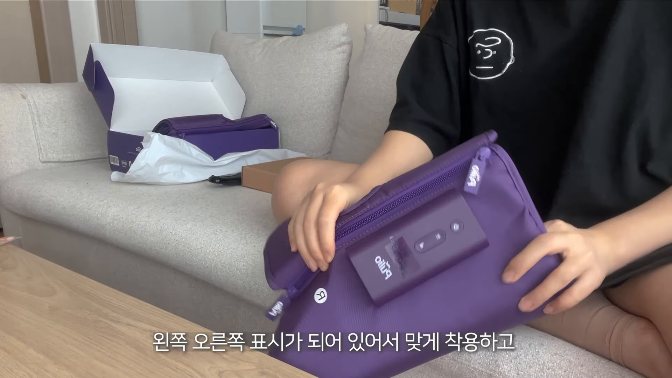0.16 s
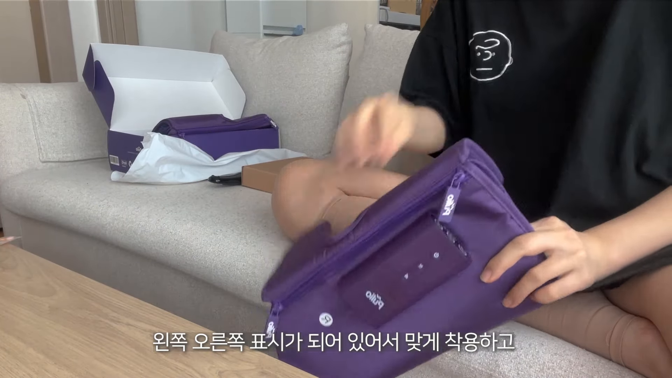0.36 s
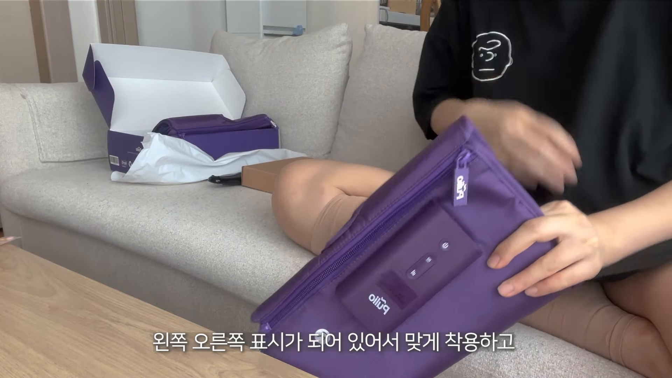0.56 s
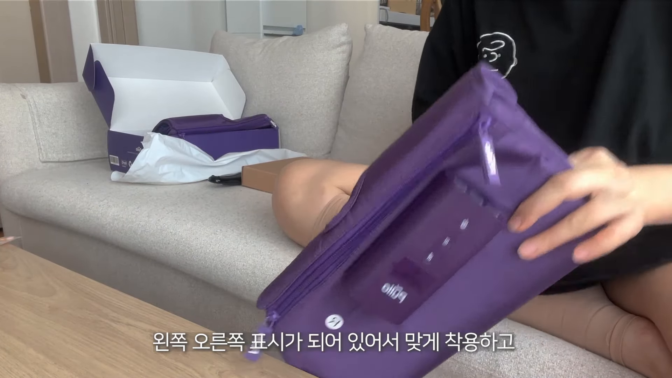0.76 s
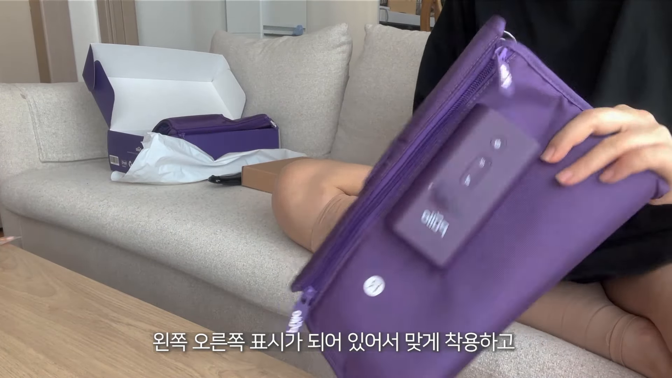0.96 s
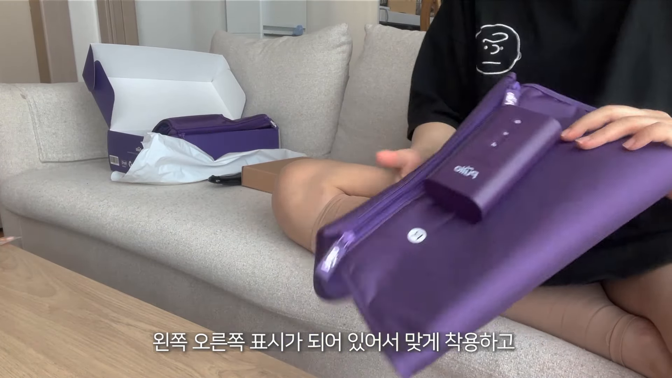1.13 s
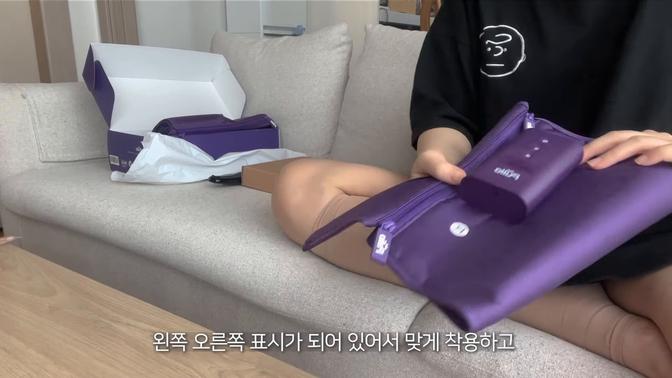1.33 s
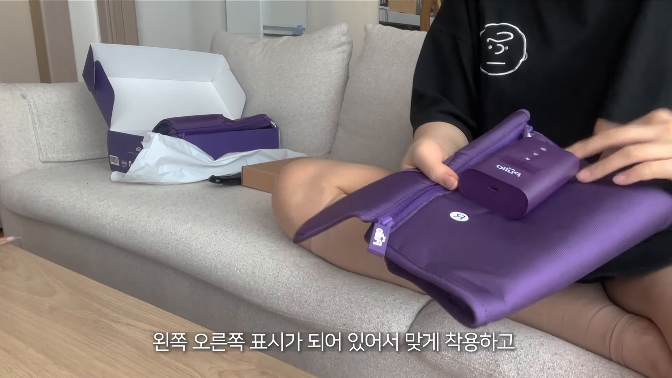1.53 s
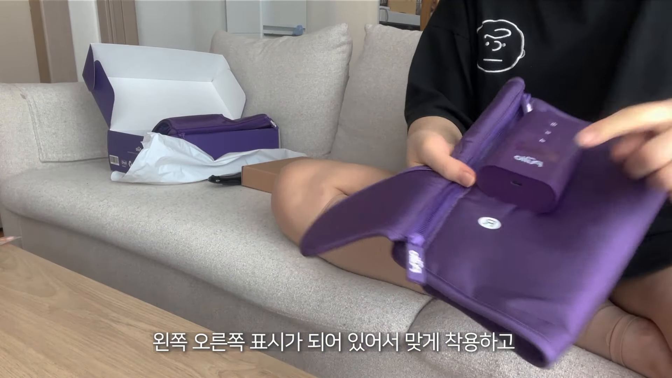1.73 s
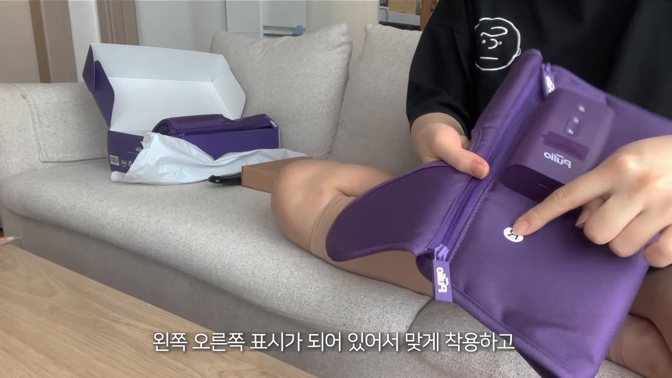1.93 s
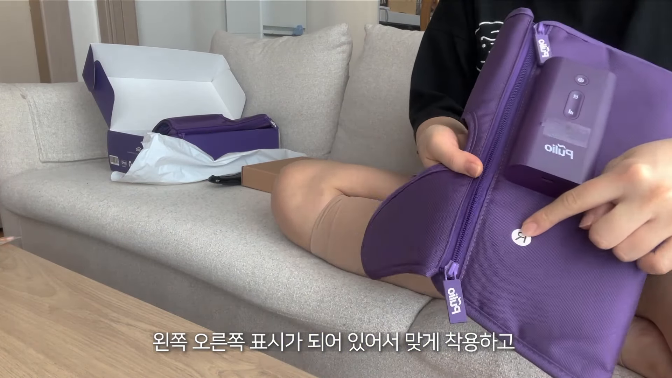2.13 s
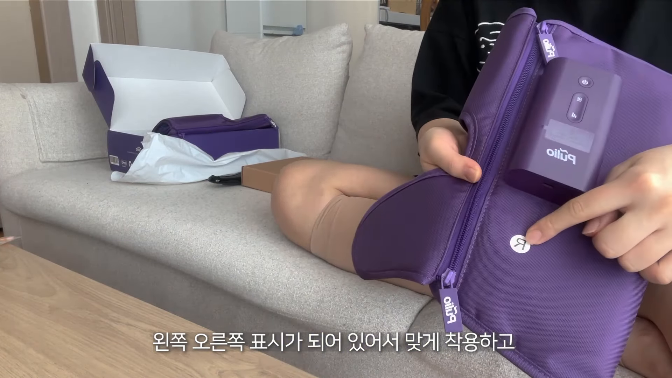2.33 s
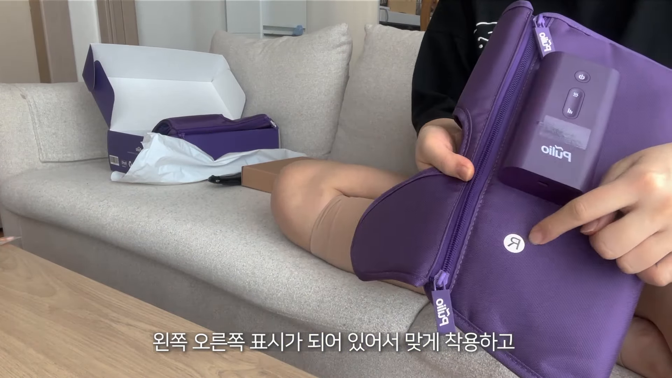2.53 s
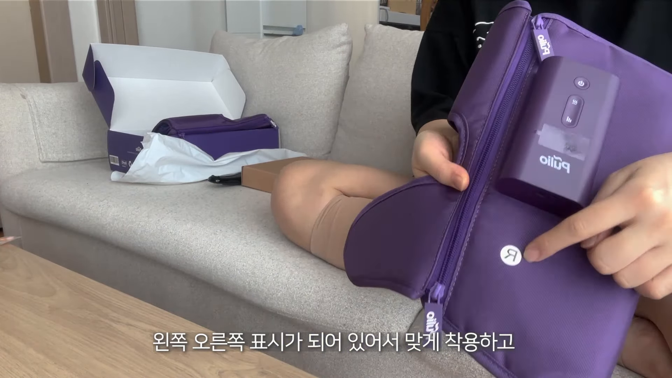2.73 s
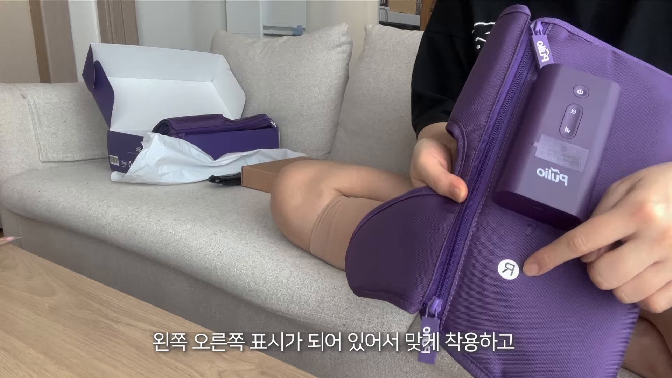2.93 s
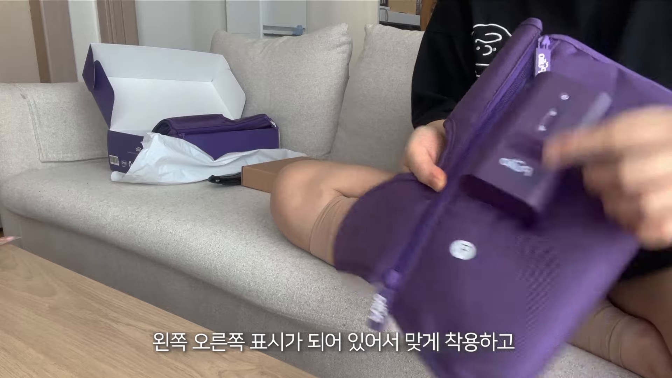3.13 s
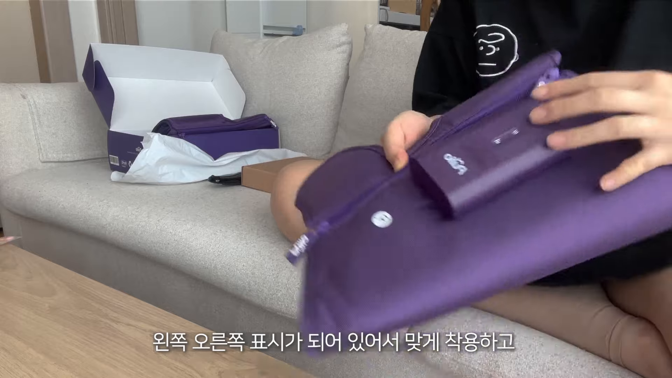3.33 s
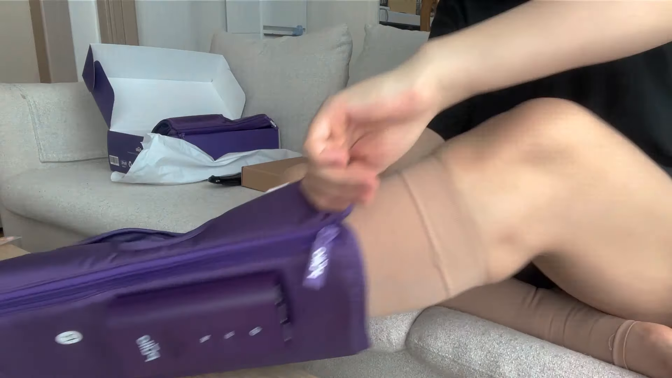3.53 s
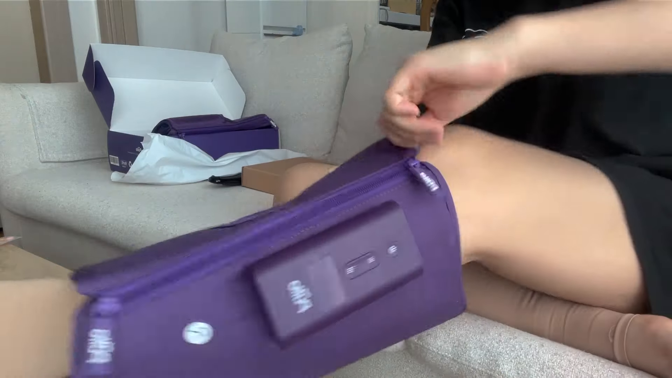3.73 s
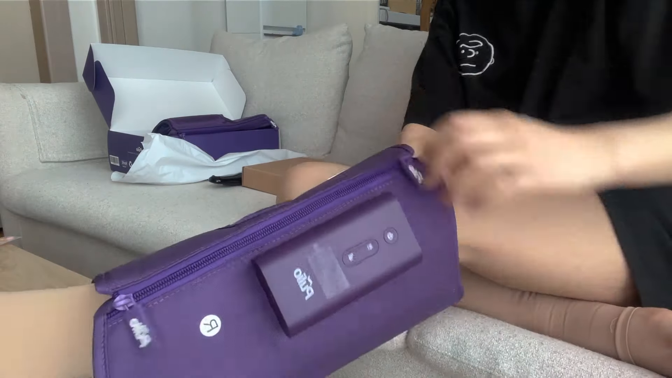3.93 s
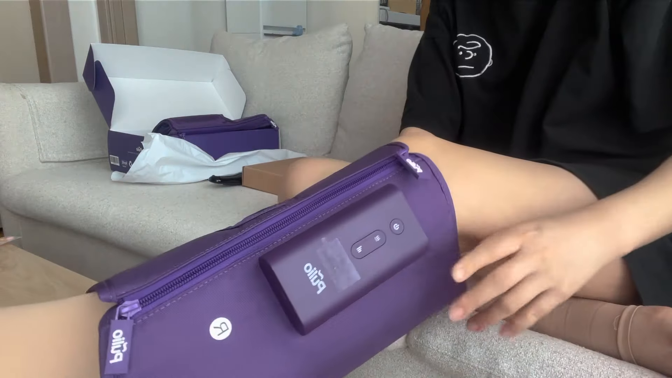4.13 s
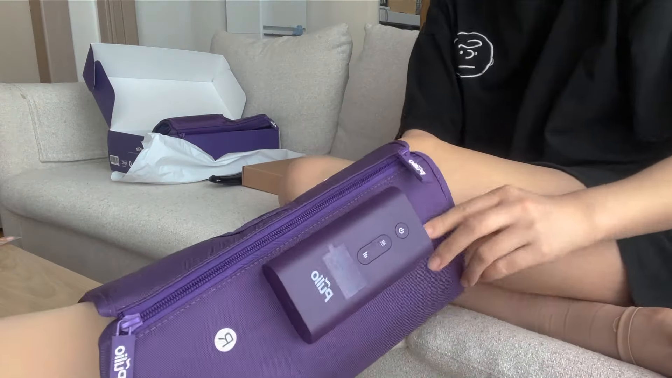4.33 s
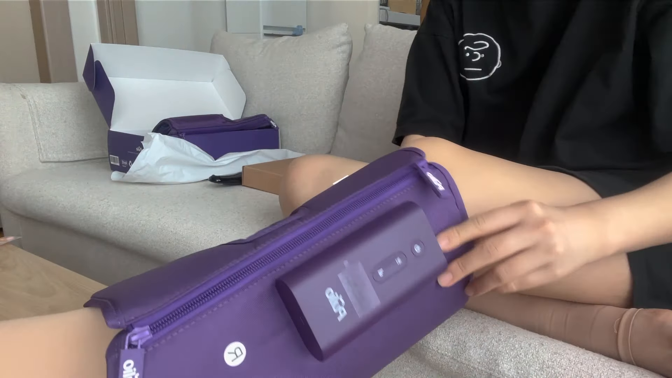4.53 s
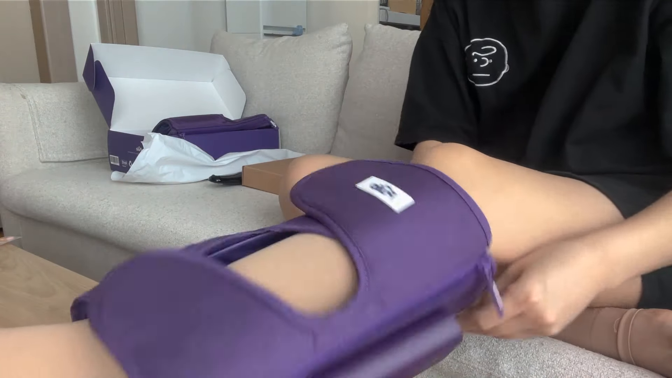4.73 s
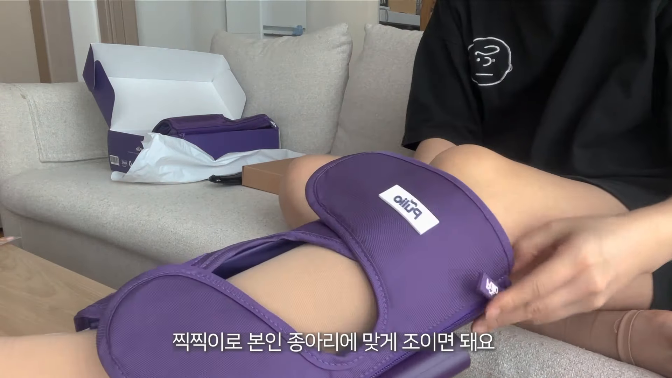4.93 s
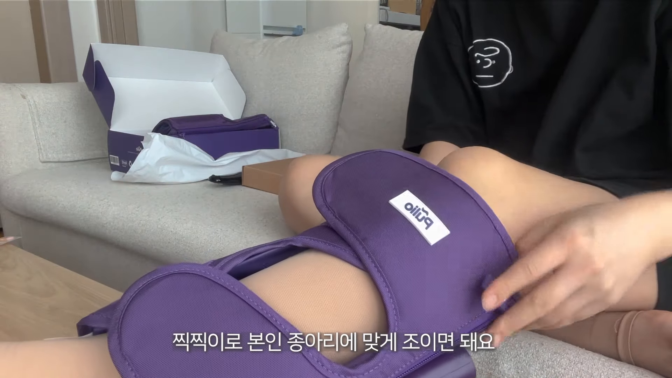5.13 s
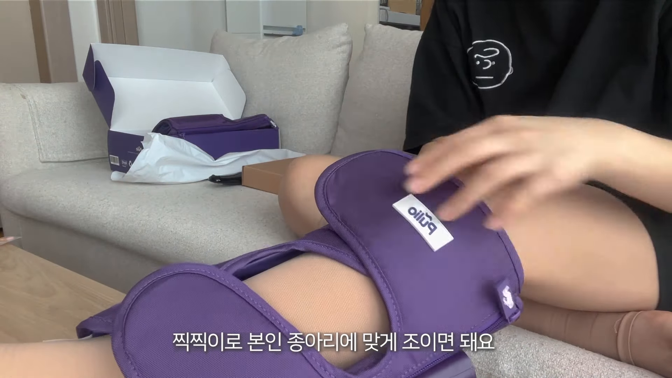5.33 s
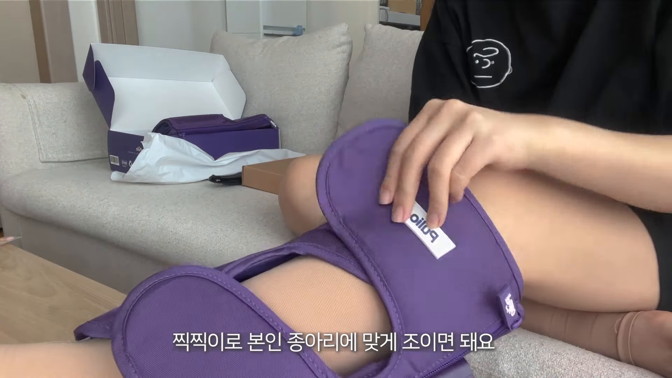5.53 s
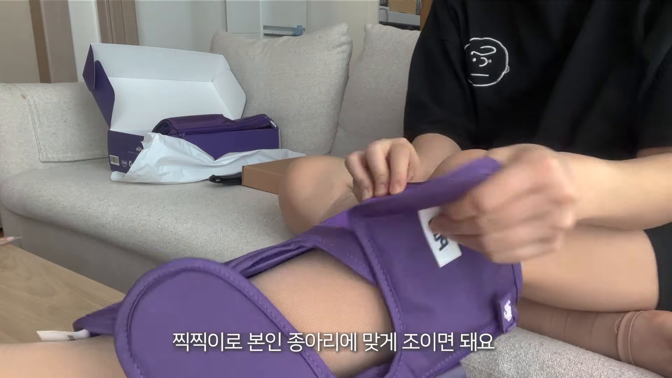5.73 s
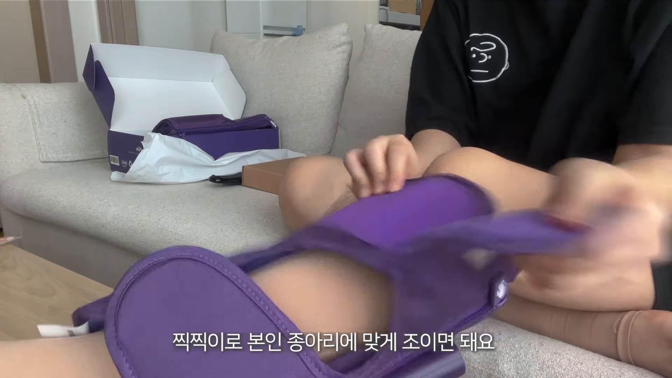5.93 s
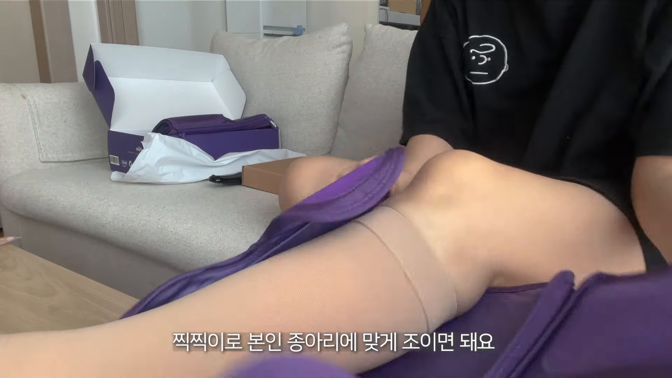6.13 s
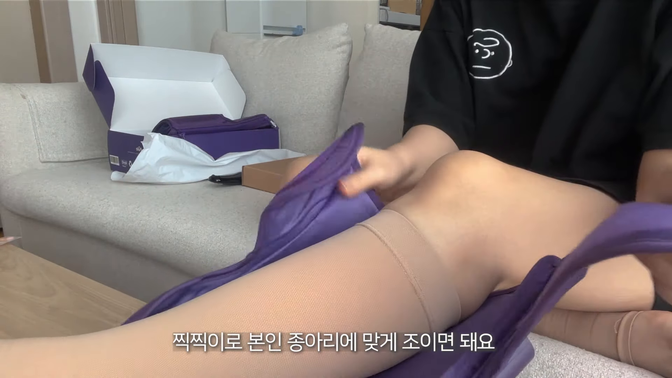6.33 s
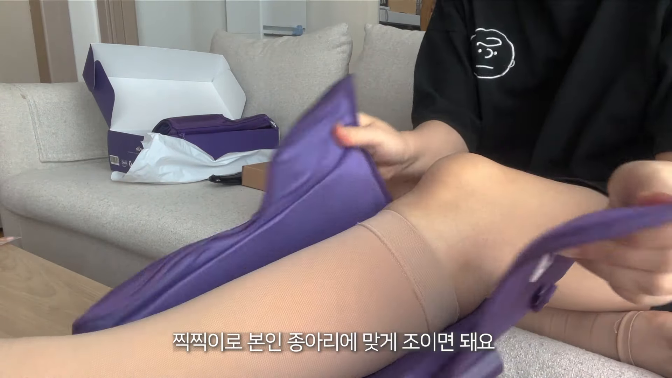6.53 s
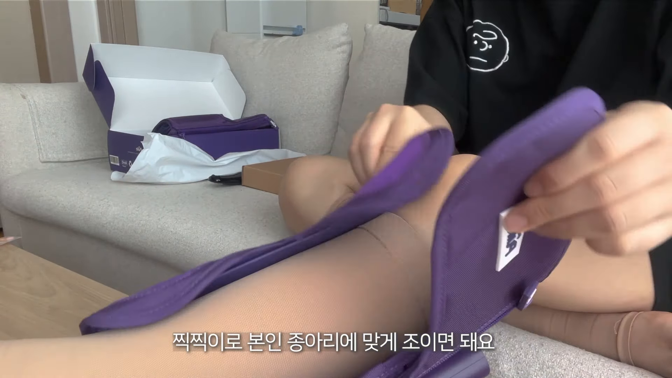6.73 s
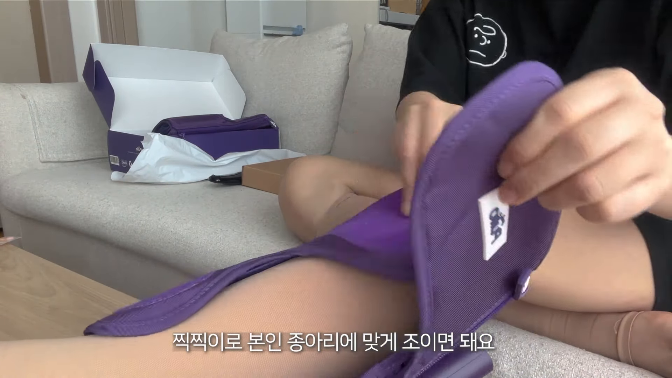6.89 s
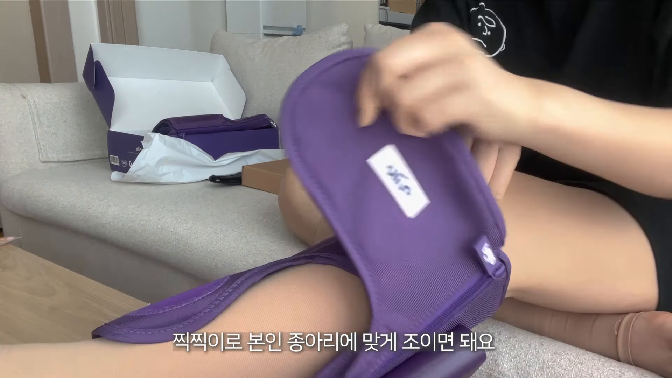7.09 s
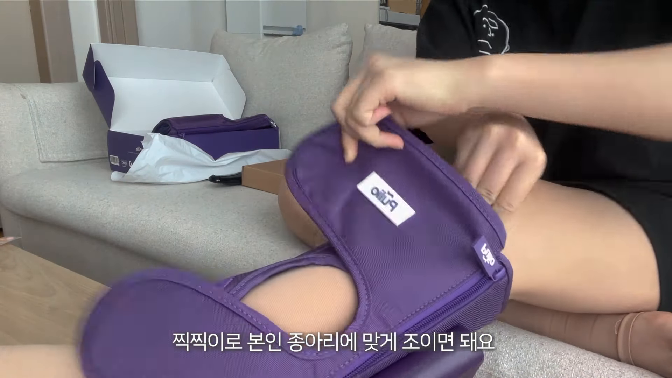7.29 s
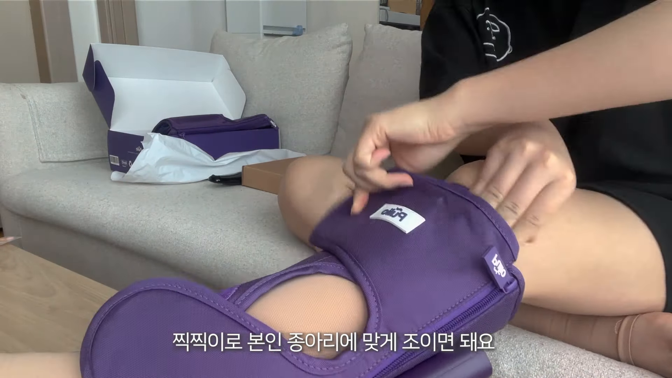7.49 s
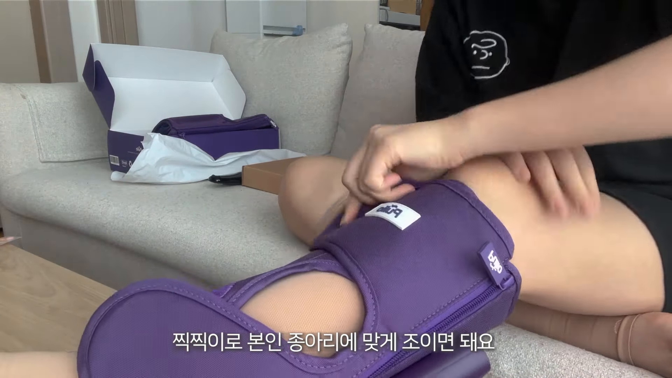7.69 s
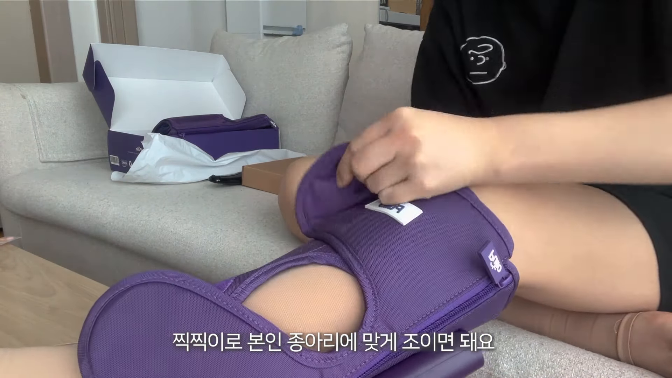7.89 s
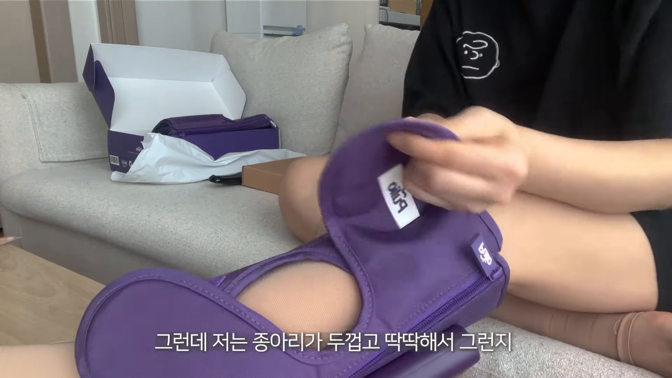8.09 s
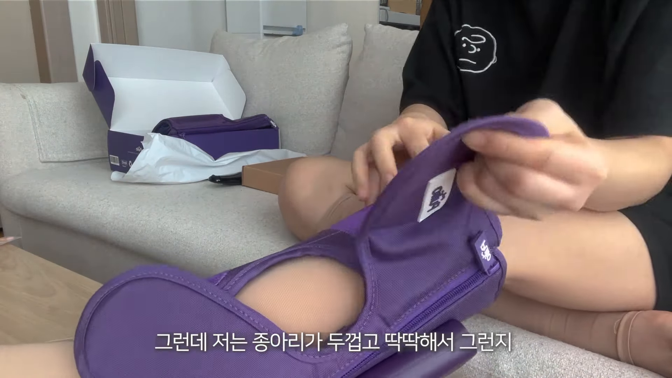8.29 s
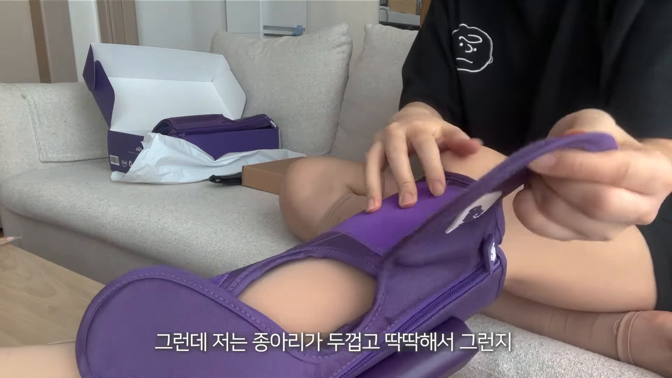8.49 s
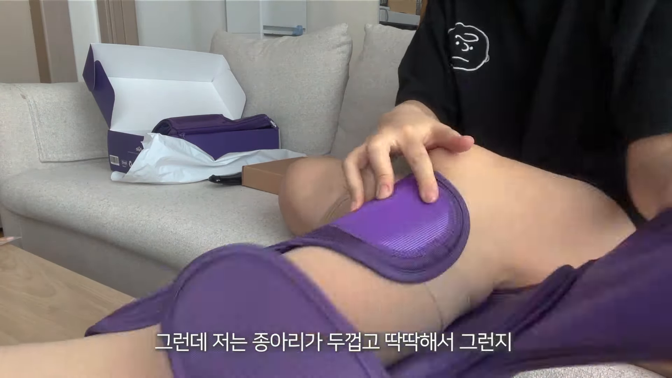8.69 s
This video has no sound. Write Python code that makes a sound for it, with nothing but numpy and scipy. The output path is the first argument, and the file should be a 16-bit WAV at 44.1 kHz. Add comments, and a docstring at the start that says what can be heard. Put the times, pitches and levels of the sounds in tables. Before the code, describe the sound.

Soft nylon swishes and a dull thump lead to a short hook-and-loop tear, more rustling, then a longer, louder ripping in a quiet room.

```python
"""In a small furnished room, a padded nylon sleeve is turned over and slid onto a leg; then its flaps are torn open.
The hook-and-loop snaps are random clicks, in runs and short slips, that also shake a resonant flap.
Filtered grains make the cloth swish, rumble and tick; decaying tones make hollow thumps.
A fingertip sings over the weave and a freed flap whoops, both as shaky tones.
A noise echo and a faint, swaying hum stand for the room, all heard through a phone."""
import sys
import numpy as np
from scipy import signal
from scipy.fft import rfft, irfft
from scipy.io import wavfile
from scipy.ndimage import uniform_filter1d

SR = 44100
rng = np.random.default_rng(int(sys.argv[2]) if len(sys.argv) > 2 else 0)


def log_audio(samples):
    """Write samples as a 16-bit WAV file to the path given in sys.argv[1]."""
    # one column per channel
    frames = np.atleast_2d(samples).T
    # limit to full scale, then quantise
    limited = np.clip(frames, -1, 1)
    pcm = np.round(limited * 32767).astype(np.int16)
    wavfile.write(sys.argv[1], SR, pcm)


N = 385875
T = np.arange(N) / SR  # time in seconds

# Knocks of the sleeve against leg or sofa: t/s, relative peak level/dB
KNOCKS = [(0.688, -40.5), (0.801, -37), (0.898, -36), (4.788, -9), (6.575, -18.5), (6.968, -34),
          (7.109, -32), (7.359, -32)]
# Tone of the rubbing cloth, also used for its ticks: f/Hz, relative density/dB
SWISH_TONE = [(590, -53), (1000, -7), (1450, -3), (2230, -4), (2940, -2.5), (5760, -1.5), (9490, -10.5),
              (14600, -13.5), (16000, -9)]


def undb(db):
    """Turn decibels into a gain."""
    return 10 ** (np.asarray(db) / 20)


def unit(x):
    """Scale a sound to an rms of 1."""
    return x / np.sqrt(np.mean(x ** 2))


def low(x, hz):
    """Gently take away what lies above hz."""
    return signal.sosfilt(signal.butter(1, hz, fs=SR, output="sos"), x)


def high_pass(x, order, hz):
    """Take away what lies below hz; a higher order cuts more steeply."""
    return signal.sosfilt(signal.butter(order, hz, "high", fs=SR, output="sos"), x)


def ring(x, hz, width_hz):
    """One resonance, with gain 1 at its centre."""
    return signal.lfilter(*signal.iirpeak(hz, hz / width_hz, fs=SR), x)


def colour(x, shape):
    """Filter along (f/Hz, dB) points without sounding early; white noise of rms 1 stays near rms 1."""
    hz, db = np.transpose(shape)
    grid_hz = np.fft.rfftfreq(4096, 1 / SR)
    curve_db = np.interp(np.log(grid_hz + 1), np.log(hz), db)
    # folding the cepstrum forward in time gives the filter its earliest possible response
    cepstrum = irfft(np.log(undb(curve_db)))
    cepstrum[1:2048] *= 2
    cepstrum[2049:] = 0
    response = irfft(np.exp(rfft(cepstrum)))
    return signal.fftconvolve(x, response / np.linalg.norm(response))[:N]


def walk(rate):
    """A random wander: about `rate` new levels per second, joined by ramps."""
    hold = int(SR / rate)
    levels = np.repeat(rng.standard_normal(N // hold + 1), hold)
    return 1.2 * uniform_filter1d(levels, hold)[:N]


def grains(rate, spread_db):
    """Random clicks of either sign, about `rate` per second, a few bigger than most; rms 1."""
    happens = rng.random(N) < rate / SR
    size = rng.exponential(1, N)
    sign = 2 * (rng.random(N) < .5) - 1
    return unit(happens * sign * undb(spread_db * np.minimum(size, 4)))


def note(rows, waver, flutter_db):
    """A tone along (t/s, f/Hz, level/dB) rows whose pitch and level shake quickly."""
    s, hz, db = np.transpose(rows)
    gate = np.clip(np.minimum(T - s[0], s[-1] - T) / 0.018, 0, 1)
    pitch_hz = np.interp(T, s, hz) * (1 + waver * walk(300))
    phase = 2 * np.pi * np.cumsum(pitch_hz) / SR
    level = undb(np.interp(T, s, db) + flutter_db * walk(150))
    return np.sqrt(2) * gate * level * np.sin(phase)


def layers(db, ring_db, fizz_db, fizz_per_ring):
    """Gains of snap, flap and fizz; the more the flap rings, the more it shields the fizz."""
    return undb(db + np.array([0 * ring_db, ring_db, fizz_db + fizz_per_ring * ring_db]))


def bursts(rows, clicks, crest_db, fizz_db):
    """Short click trains in three layers (snap, flap, fizz): sudden start, short run, quick end."""
    out = np.zeros((3, N))
    t = T[:2000]
    for s, db, ring_db, ms in rows:
        i = int(s * SR)
        rise = np.minimum(0.21 + t / 0.0012, 1)
        shape = rise * np.exp(-(t * 1000 / ms) ** 1.15)
        run = shape * clicks[i:i + len(t)]
        run[0] += 1.6  # an extra click at the start
        # the same energy however the clicks fall
        run *= np.linalg.norm(shape) / np.linalg.norm(run)
        gains = layers(db - crest_db, ring_db, fizz_db, -0.18)
        out[:, i:i + len(t)] += run * gains[:, None]
    return out


def crackle(snap, flap, top, shape, patchy_db):
    """Each click is a bright snap and a shake of the flap; the colour shifts as the seam moves along."""
    # Resonances of the stiff flap: f/Hz, width/Hz, relative level/dB
    flap_modes = [(94, 38, -14.5), (251, 35, -15.5), (551, 205, 1.5), (800, 230, -7.5), (956, 320, -5.5),
                  (1194, 267, 1), (1546, 227, -5.5)]
    bright = colour(snap, shape)
    # neighbouring low-passes differ by one band; every band wanders by itself
    lows = [0 * bright] + [low(low(bright, hz), hz) for hz in (2420, 3670, 6040, 12340)]
    snaps = sum((b - a) * undb(patchy_db * walk(90)) for a, b in zip(lows, lows[1:]))
    fizz = high_pass(colour(top, shape), 2, 8500)
    shake = 0
    for hz, width_hz, db in flap_modes:
        shake = shake + undb(db) * ring(flap * undb(patchy_db * walk(40)), hz, width_hz)
    return snaps + undb(7.0) * fizz + undb(12) * shake


def hush():
    """The room's faint hum: filtered noise whose level sways slowly."""
    # Tone of the hum: f/Hz, relative density/dB
    hush_tone = [(18, -35), (30, 2.5), (295, -5), (540, -13), (740, -17.5), (1130, -17), (1320, -27),
                 (5740, -31), (9710, -41), (12300, -25), (16000, -26)]
    sway_db = 2 * walk(5)
    return undb(-71.5 + sway_db) * colour(rng.standard_normal(N), hush_tone)


def peak(s, db, rise_ms, fall_ms):
    """Power that climbs to db at s and sinks again, both straight in dB (ms per 10 dB)."""
    ms = (T - s) * 1000
    return undb(db - 10 * np.maximum(-ms / rise_ms, ms / fall_ms)) ** 2


def handling():
    """Gains of swish and rumble: uneven rustle, single strokes, and padding settling after knocks."""
    # Uneven rustle that swells, drops out and returns as the hands shift the sleeve:
    # t/s, relative level/dB
    rustle_level = [(0, -56), (.345, -56.5), (.36, -74), (.5, -64), (1.03, -57), (1.18, -54), (1.52, -56),
                    (1.62, -80.5), (1.78, -87), (1.9, -67), (2.23, -64), (2.245, -86), (2.96, -94),
                    (3.01, -55.5), (3.42, -58.5), (3.47, -68), (3.5, -52.5), (4.2, -59), (4.47, -79),
                    (4.5, -61), (4.9, -59), (5.11, -66.5), (5.5, -53.5), (6.0, -46), (6.13, -51.5),
                    (6.69, -59.5), (6.83, -45), (7.03, -65), (7.7, -62.5), (8.75, -56)]
    # Strokes over the cloth: loudest at t/s, relative swish level/dB, rumble over swish/dB,
    # rise/ms per 10 dB, fall/ms per 10 dB
    cloth_strokes = [(.25, -52, -1, 52, 69), (0.412, -41, -7, 14.4, 30), (.63, -51.5, 1, 81, 66),
                     (.812, -48, -1.5, 35, 78), (1.791, -50.5, -19, 3, 120), (1.88, -47, -21, 37, 18),
                     (1.996, -52.5, -32, 60, 67), (2.624, -58, -13.5, 226, 45), (3.19, -43.5, -42, 86, 75),
                     (3.672, -42, -4.5, 75, 110), (4.33, -49, -11, 130, 53), (4.648, -48, -3.5, 118, 180),
                     (5.25, -65.5, 15.5, 40, 17), (6.13, -60.5, 14, 110, 8.9), (6.33, -42.5, 9, 25, 31.5),
                     (6.515, -41, 6.5, 7.8, 46), (7.048, -42.5, -13, 8, 53), (7.227, -51.5, 7, 96, 8),
                     (7.518, -45, -7, 155, 137)]
    # powers add up here and become gains at the end
    high = undb(np.interp(T, *np.transpose(rustle_level))) ** 2
    deep = high * undb(-8) ** 2
    for s, db, rumble_db, rise_ms, fall_ms in cloth_strokes:
        stroke = peak(s, db, rise_ms, fall_ms)
        high = high + stroke
        deep = deep + stroke * undb(rumble_db) ** 2
    for s, db in KNOCKS:
        deep = deep + peak(s + 0.0033, db - 30, rise_ms=2, fall_ms=63)
    return np.sqrt(high), np.sqrt(deep)


def cloth():
    """Fine fibres swish and prickle, the padding rumbles in coarser grains, creases and zip tabs tick."""
    # Tone of the padding: f/Hz, relative density/dB
    padding_tone = [(41, -56), (70, -15.5), (276, -6.5), (444, 0), (627, -2), (746, -2.5), (874, -3.5),
                    (2200, -15.5), (2860, -15), (4840, -120)]
    # Ticks of stiff creases and zip tabs: t/s, relative peak level/dB, flap ring over tick/dB
    crease_ticks = [(0.307, -28, -4.5), (0.3797, -26, -8), (0.4232, -26, -11), (0.548, -43, 3),
                    (1.097, -44, 10), (1.1905, -28, 0), (1.256, -21, -8.5), (1.326, -40, -14),
                    (1.7833, -35, -9), (2.5994, -36, -19), (2.9685, -50.5, 12), (2.99, -48, 15),
                    (3.3322, -29.5, -9), (3.5855, -36, 3), (3.6578, -35, -17), (3.6755, -29, -24),
                    (3.8385, -33, 8), (4.2125, -36.5, 4.5), (4.7657, -48, 14), (4.7833, -30, 14.5),
                    (5.194, -53.5, 22), (5.222, -50, 14.5), (5.4425, -34, -10), (6.2952, -32, 6.5),
                    (6.3248, -31.5, 10), (6.486, -43.5, 15), (6.515, -38.5, 6), (6.554, -25.5, 5.5),
                    (6.576, -39, 14.5), (6.5875, -30, 1), (6.6125, -29.5, -1), (6.9164, -37, 11),
                    (7.11, -40.5, 11.5), (7.1264, -27, -1), (7.1671, -19, -4), (7.274, -36, 4),
                    (7.299, -31.5, 4.5), (7.3243, -47, -18), (7.3615, -34, 1.5), (7.3947, -30, -9),
                    (7.4493, -35.5, 12.5), (7.4657, -33, 5), (7.5038, -35.5, 7), (7.544, -34, 11.5),
                    (7.5676, -28, -0.5)]
    tick_ms = 2.32
    high, deep = handling()
    fibres = grains(15000, 2.8) * undb(2.23 * walk(60))
    prickle = undb(-10.5) * grains(72, 5.3)
    swish = colour((fibres + prickle) * high, SWISH_TONE)
    lumps = grains(900, 1.04) * undb(3.95 * walk(50))
    rumble = colour(lumps * deep, padding_tone)
    rows = [(*row, tick_ms) for row in crease_ticks]
    tick, flap, top = bursts(rows, grains(5000, 2.7), crest_db=9.6, fizz_db=-3.5)
    ticks = crackle(tick, flap, top, SWISH_TONE, patchy_db=4.0)
    return undb(-4.0) * swish + undb(-2.0) * rumble + ticks


def thumps():
    """A soft push rings the air and padding inside the sleeve; the ring swells as the padding gives."""
    # Hollow tones inside the sleeve: f/Hz, relative level/dB, time to fall by 60 dB/s
    hollow_modes = [(156.4, -14, 0.26), (222.4, -0.5, 0.19), (316, 8, 0.045), (365, -2.5, 0.24),
                    (467, 3.5, 0.094), (537, 13, 0.081), (690, -12, .1), (900, -14, .1)]
    contact_ms, swell_s = 2.84, 0.0081
    out = np.zeros(N)
    t = T[:SR // 2]
    push = np.hanning(int(contact_ms * SR / 1000) + 2)
    swell = np.sin(np.pi / 2 * np.minimum(t / swell_s, 1)) ** 2
    for s, db in KNOCKS:
        modes = np.zeros(len(t))
        for hz, mode_db, t60 in hollow_modes:
            a, b, c = rng.standard_normal(3)  # each knock differs a little in level, pitch and phase
            tone = np.sin(2 * np.pi * hz * (1 + 0.016 * b) * t + 3 * c)
            modes += undb(mode_db + 0.55 * a) * tone * 1000 ** (-t / t60)
        softened = np.convolve(modes, push / push.sum())[:len(t)]
        i = int(s * SR)
        out[i:i + len(t)] += undb(db - 11.5) * swell * softened
    return out


def weave():
    """A fingertip crosses the ribbed weave; ribs pass at a slightly uneven rate and sing."""
    # Path of the fingertip: t/s, f/Hz (ribs per second), level/dB
    rib_path = [(3.095, 1800, -60), (3.13, 1900, -62), (3.17, 1900, -58), (3.2, 1400, -61),
                (3.225, 1800, -56), (3.25, 1160, -70)]
    return note(rib_path, waver=0.0186, flutter_db=2.2)


def pulled(fade_s):
    """Gains of snap, flap and fizz through the longer, uneven pulls, silent between them."""
    # Longer, uneven pulls on a flap, one list each: t/s, relative snap level/dB, flap ring over snap/dB
    pull_paths = [
        [(5.345, -69, 17), (5.37, -71, 17), (5.41, -70, 16)],
        [(5.561, -38, 4), (5.609, -24, -12.5), (5.7, -24, -8.5), (5.755, -14, -7), (5.83, -19, -8.5),
         (5.883, -28, -12.5), (5.935, -10.5, -6), (5.945, -26, -7)],
        [(6.157, -34.5, 9.5), (6.2, -34.5, 8), (6.225, -50.5, 7.5)],
        [(6.725, -37, 6.5), (6.759, -47.5, 12), (6.778, -55, 12), (6.82, -51.5, 16.5)],
        [(7.83, -31.5, 0.5), (7.95, -23.5, -3.5), (8.06, -19, -2.5), (8.112, -20.5, -11.5),
         (8.124, -28.5, -8.5), (8.185, -15, -7.5), (8.225, -16, -4.5), (8.29, -30.5, -8.5), (8.382, -16, -7.5),
         (8.46, -37.5, -10)],
        [(8.503, -24.5, -8.5), (8.572, -20.5, -5.5), (8.6, -38, 4)],
    ]
    gains = 0
    for s, db, ring_db in map(np.transpose, pull_paths):
        gate = np.clip(np.minimum(T - s[0], s[-1] - T) / fade_s + 1, 0, 1)
        gains = gains + gate * layers(np.interp(T, s, db), np.interp(T, s, ring_db), -2.5, -0.65)
    return gains


def hooks():
    """Hooks snap free in runs and slips; the seam advances in small jerks, so the run throbs."""
    # Slips, where a row of hooks lets go at once: t/s, relative peak level/dB,
    # flap ring over snap/dB, length/ms
    hook_slips = [(5.4166, -29, 16.5, 4.6), (5.5131, -10, -18, 3.3), (5.5219, -16.5, 3.5, 5.8),
                  (5.545, -11, -17, 3.5), (5.5647, -9, 0, 7), (5.6019, -12, 6.5, 13.6),
                  (5.6277, -10.5, 4, 13), (5.7145, -14, 8, 7.7), (5.8885, -9.5, -3.5, 18),
                  (5.9291, -5, -6, 3.8), (6.1405, -33.5, 20.5, 8.9), (6.6972, -22.5, -7.5, 6),
                  (6.7226, -42, -8, 6), (6.782, -28, 12.5, 17), (7.1561, -26, -1.5, 7.6),
                  (7.1846, -29, 2, 2), (7.191, -19, -12, 2.3), (7.2095, -9, -7.5, 2.9),
                  (7.2228, -9, -23, 1.6), (7.43, -22, -5, 3.1), (7.7138, -20.5, 0.5, 14.5),
                  (7.7373, -12, -12, 9.1), (7.7584, -10.5, -2.5, 5.6), (7.7837, -12, -2, 2.6),
                  (7.793, -13, -2.5, 5.9), (7.812, -15, -22, 10), (7.8285, -9, -9.5, 14),
                  (7.868, -4, -14, 9.9), (7.922, 1, -14, 32), (7.982, -3.5, -27, 11), (8.0027, -11, 5, 6.6),
                  (8.0213, -3, -20, 17), (8.0472, 1, -11, 10), (8.1484, -3, -15, 3.4),
                  (8.1732, -22, -12, 7), (8.5048, -1.5, -6, 6.4), (8.519, -14, 3, 5),
                  (8.546, -15, -20, 3.9), (8.5754, 6, -20, 3.5), (8.605, -18.5, 15.5, 7.8),
                  (8.6403, -24, 19, 8.4), (8.654, -20.5, 13.5, 3.7)]
    # Tone of a snap: f/Hz, relative density/dB
    snap_tone = [(880, -28.5), (1500, 5), (2120, -2), (3380, 2), (3620, 0.5), (4290, 2.5), (6690, 1.5),
                 (9650, -16), (13900, -15.5), (16000, -24.5)]
    throb = unit(undb(2.8 * np.tanh(walk(250)) + 1.02 * np.tanh(walk(60))))
    tear = undb(-3.0) * throb * grains(4500, 3.7) * pulled(fade_s=0.0028)
    slips = bursts(hook_slips, grains(3500, 3.0), crest_db=14.25, fizz_db=-4)
    snap, flap, top = tear + slips
    return crackle(snap, flap, top, snap_tone, patchy_db=4.5)


def whoop():
    """The freed flap whips open and its pocket of air whoops upward, far more roughly than the weave."""
    # Rising whoop: t/s, f/Hz, level/dB
    whoop_path = [(6.157, 705.4, -24), (6.185, 793, -32), (6.198, 918, -21.5), (6.222, 980, -50)]
    return note(whoop_path, waver=.22, flutter_db=5.8)


def room(x):
    """Diffuse echo that starts after the first walls; the treble dies at its own pace."""
    t60_s, treble_t60_s = 0.33, 0.37  # time to fall by 60 dB
    t = T[:int(.6 * SR)]
    noise = rng.standard_normal(len(t))
    dull = low(noise, 2900)
    tail = dull * 1000 ** (-t / t60_s) + (noise - dull) * 1000 ** (-t / treble_t60_s)
    tail *= np.clip(t / 0.0016 - 1, 0, 1)  # silent for 1.6 ms, then fades in
    return undb(-10) * signal.fftconvolve(x, tail / np.linalg.norm(tail))[:N]


def scene():
    """Everything near the phone, its echo, and the hush of the room."""
    near = cloth() + thumps() + weave() + hooks() + whoop()
    return (near + room(near) + hush())[None]


def record(dry):
    """The phone rounds peaks, drops the deepest bass and cuts the top."""
    rounded = np.tanh(1.5 * dry) / 1.5
    trimmed = high_pass(rounded, 5, 58)
    return signal.sosfilt(signal.ellip(10, .2, 85, 15850, fs=SR, output="sos"), trimmed)


dry = scene()
out = record(dry)
log_audio(out)
```